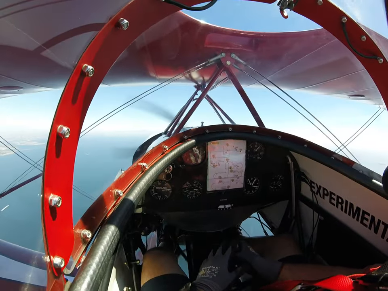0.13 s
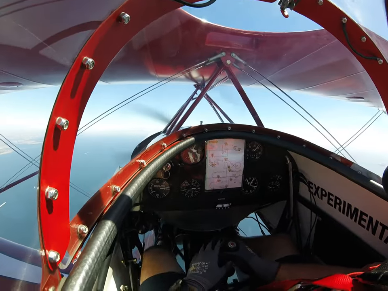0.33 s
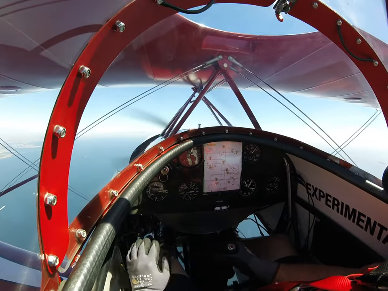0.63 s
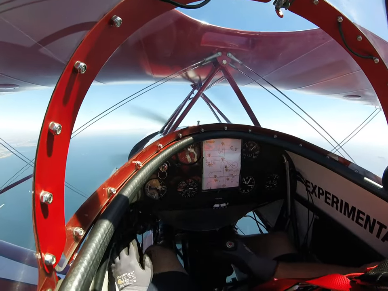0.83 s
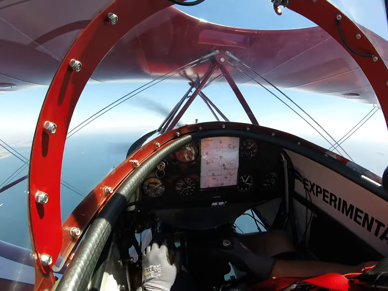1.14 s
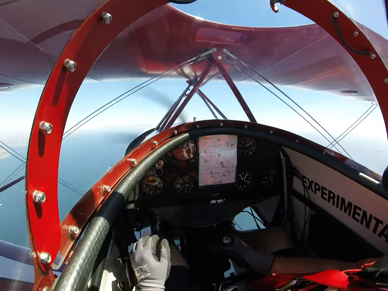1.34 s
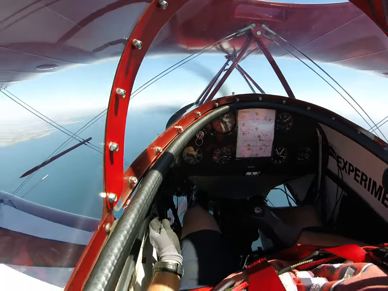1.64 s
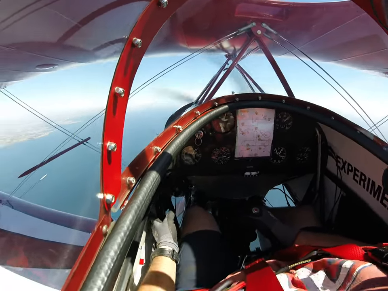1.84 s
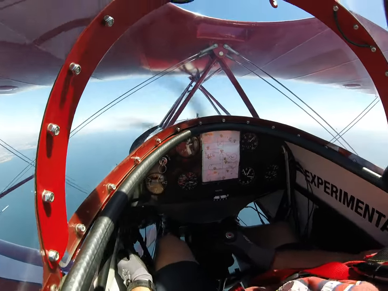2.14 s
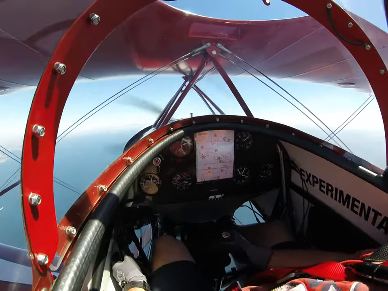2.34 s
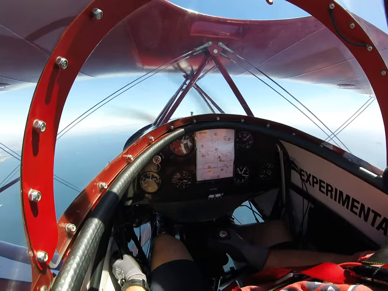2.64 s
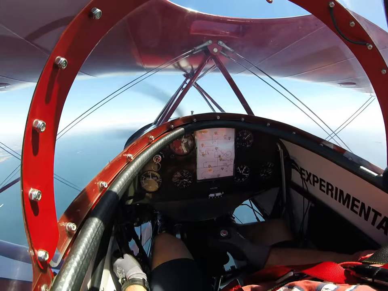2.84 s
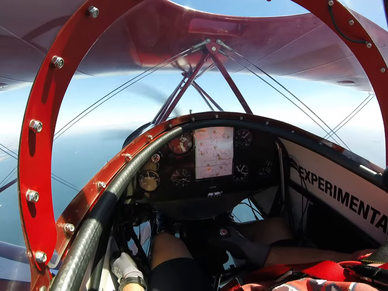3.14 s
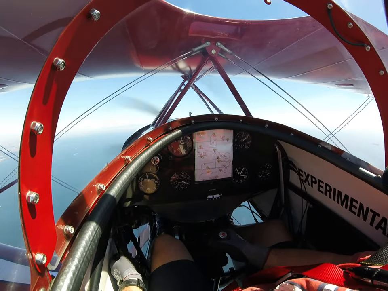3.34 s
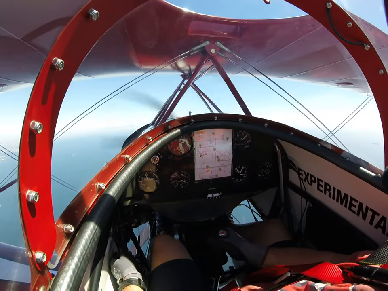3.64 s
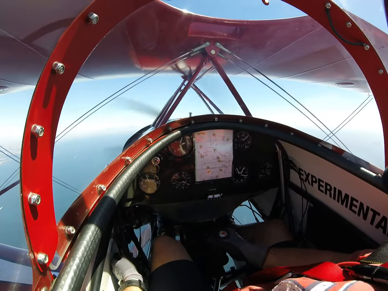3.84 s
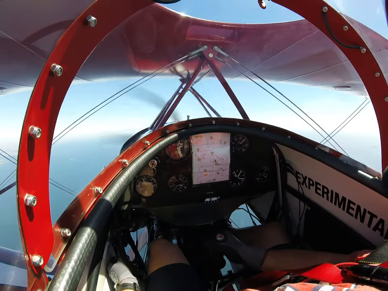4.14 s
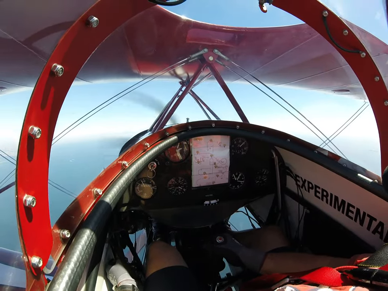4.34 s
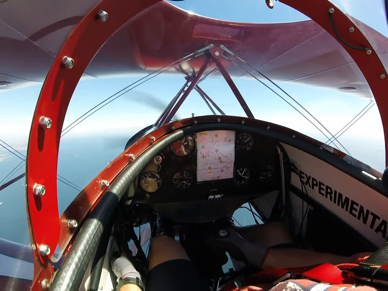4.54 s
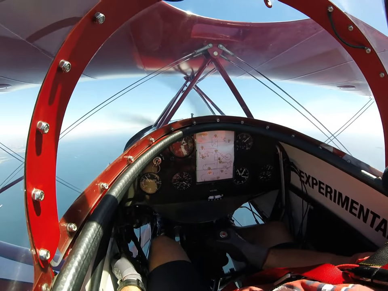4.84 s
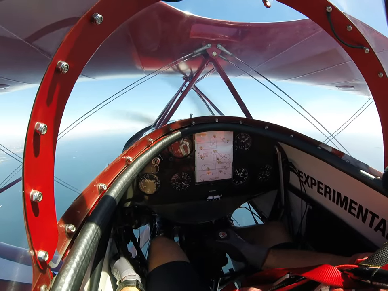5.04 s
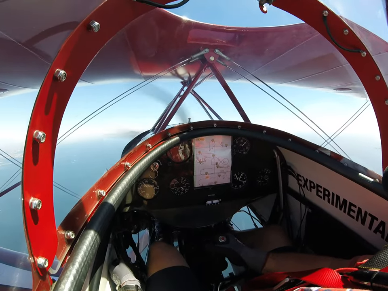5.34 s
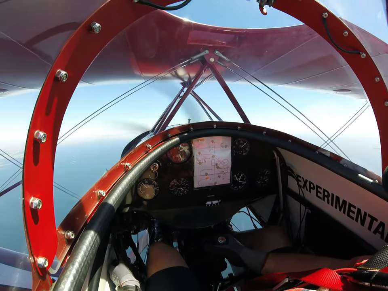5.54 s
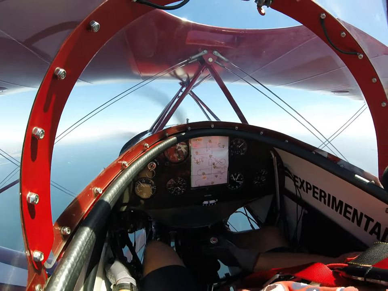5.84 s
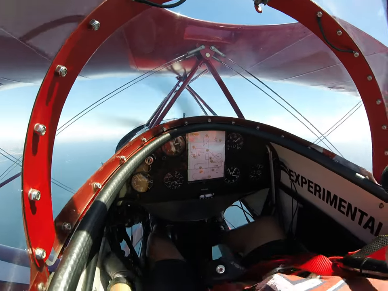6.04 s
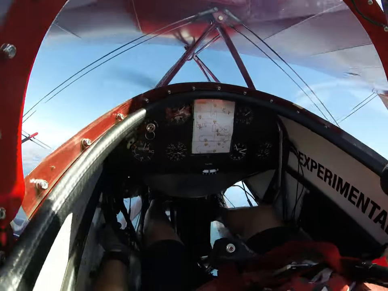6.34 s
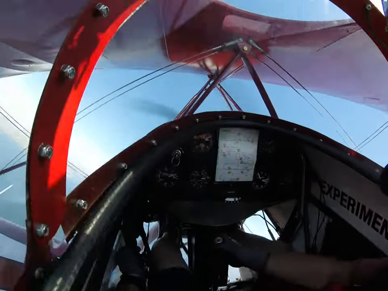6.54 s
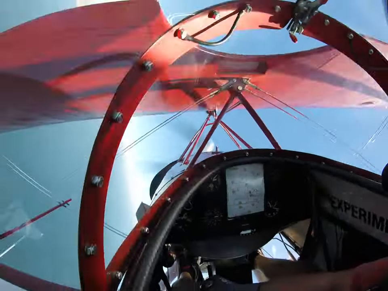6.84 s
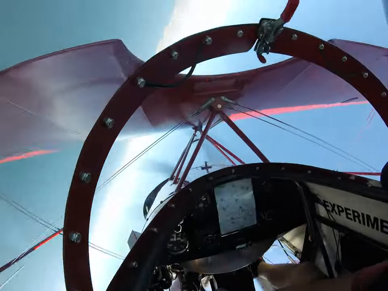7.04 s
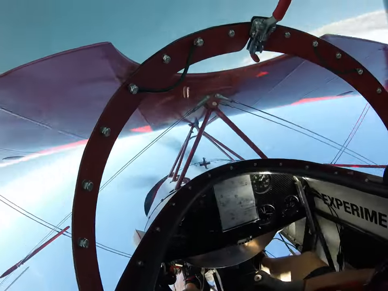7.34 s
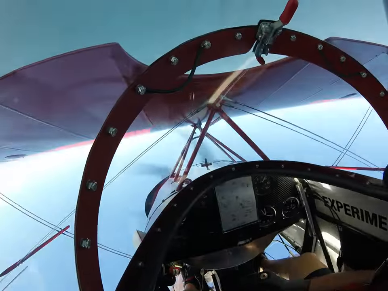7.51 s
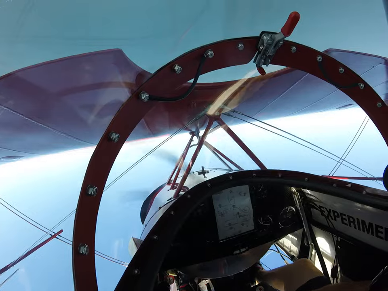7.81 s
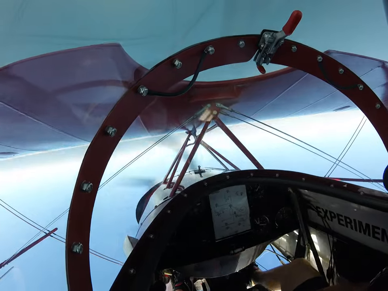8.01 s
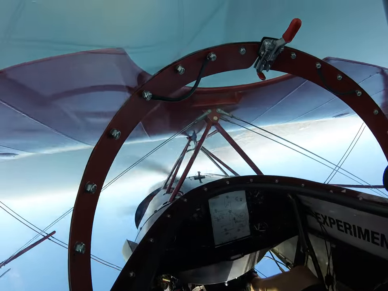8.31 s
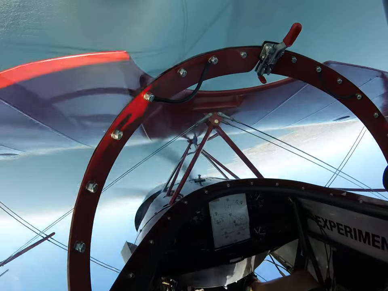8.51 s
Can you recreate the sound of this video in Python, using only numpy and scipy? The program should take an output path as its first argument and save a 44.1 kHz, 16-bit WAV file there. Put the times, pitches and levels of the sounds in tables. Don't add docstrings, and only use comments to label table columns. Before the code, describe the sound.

From the start, a loud piston engine and propeller drone fills a small aircraft cockpit: a low, rough hum around 80 Hz with a stronger buzzing exhaust note around 120 Hz and uneven growl between. Broad wind roar, airy hiss and ringing panels surround it. Over 0 to 6 seconds the pitch creeps up by about a semitone and the wind strengthens slightly; tiny ticks occur near 0.1, 2.1 and 5.3. At about 6.1 there is a tap and tick, then from 6.3 the pitch sags while deep, lumpy buffeting shakes the airframe. Rapid dull fabric slaps cluster from 6.6 to 6.85. Around 7 the cockpit suddenly calms, quieter and leaner, with pitch partly recovering. Until 8.67 the drone stays nearly steady and gradually regains level. The close onboard microphone sounds mono, slightly saturated, with patchy fine treble and no extreme highs.

```python
import sys
import numpy as np
from scipy import signal
from scipy.fft import rfft, irfft, next_fast_len
from scipy.io import wavfile
from scipy.ndimage import uniform_filter1d

SR = 44100
rng = np.random.default_rng(int(sys.argv[2]) if len(sys.argv) > 2 else 0)


def transcribe(signal):
    frames = np.atleast_2d(signal).T
    limited = np.clip(frames, -1, 1)
    pcm = np.round(limited * 32767).astype(np.int16)
    wavfile.write(sys.argv[1], SR, pcm)


def attenuation_scalar(level_db):
    decades = np.asarray(level_db, float) / 20
    return 10 ** decades


N = 382347

# t/s, blade rate f/Hz
SHAFT_SPEED = [(0, 79.46), (0.6, 79.76), (1, 80.28), (3, 81.95), (4, 82.7), (5.5, 83.8), (5.9, 83.9),
               (6.15, 84.2), (6.3, 83.94), (6.4, 83.02), (6.7, 80.32), (6.8, 79.78), (7, 80.62),
               (7.25, 81.3), (7.8, 80.94), (8.1, 80.82), (8.48, 81.14), (8.67, 81.14)]
# multiple of the four-stroke cycle, level/dB, lag/rad
UNEVEN_CYLINDERS = [(2, -25, 0.3), (3, -17, 1.95), (5, -12, 1.17), (7, -12, 0.33), (9, -5.5, 0.2),
                    (10, -22, 0.61), (11, -18, 0.56), (13, -28, 0.76), (14, -25.5, 0.7), (18, -25, 0.56),
                    (36, -30.5, 0.89)]
# f/Hz, level/dB
HISS_SPECTRUM = [(500, -17), (850, 0), (1150, -2.5), (1900, -1.5), (2600, -5.5), (3700, -7), (4050, -6.5),
                 (4400, -13), (5300, -15), (6100, -12), (6900, -16.5), (7600, -31), (9000, -41)]
# f/Hz, level/dB
SHEEN_SPECTRUM = [(6500, -19), (7500, 1), (9000, -3.5), (11200, -9.5), (11700, -15), (12900, -23.5),
                  (13200, -47)]
# f/Hz, level/dB
ROAR_SPECTRUM = [(30, -16), (60, 2.5), (110, 8), (170, 2.5), (210, -1), (280, -5), (400, -0.5), (520, -4),
                 (700, -11), (1000, -23), (1500, -18)]
PANEL_HZ = [310, 397, 440, 545, 600, 690, 735, 850, 995, 1345]
# width/Hz, level/dB re roar
PANEL_RESPONSE = [(30.2, -15.5), (26.8, -7), (30, -22), (23, -20), (20.2, -12), (24.6, -16.5), (30.4, -25),
                  (44.5, -18), (54, -20.5), (60, -24)]
# f/Hz, width/Hz, level/dB re slipstream
MICROPHONE_PORT = (6460, 100, -19)
# t/s, peak level/dB
FABRIC_SLAPS = [
    (6.111, -26),
    (6.399, -29),
    (6.638, -19),
    (6.68, -19),
    (6.724, -21),
    (6.761, -16),
    (6.814, -17),
    (6.849, -27),
]
# t/s, peak level/dB
HOUSING_TICKS = [
    (0.0867, -44),
    (2.0976, -38),
    (5.3274, -40),
    (6.1629, -37),
]
# f/Hz, level/dB re mean there
TREBLE_THRESHOLD = [(6000, -20), (7000, -12), (8300, -4), (9600, -2), (11000, -1), (12500, 3)]

# start t/s, attack/s, hold/s, release/s
STALL = (6.32, .11, 0.45, 0.18)
SHAKE = (6.42, 0.13, 0.3, 0.14)
DUCK = (6.88, 0.22, .1, 1.22)
LULL = (6.89, .09, .2, .14)
SAG = (6.95, .35, .5, .45)
INVERTED = (7.5, .3, 2, 1)

# cruise level/dB rms, slope/(dB per Hz of blade rate), stall/dB, duck/dB, flutter/dB
HISS_LAW = (-33, 0.78, 0, -4.5, 0.28)
SHEEN_LAW = (-21.5, -.1, -3, 0.5, 0.2)
ROAR_LAW = (-27.5, 0.63, -0.5, -2.5, 0.4)
BUFFET_LAW = (-35.5, .5, 1, -4, 3)
FIRING_LAW = (-22, 1.9, 7.5, 0.5, 1.5)
TWICE_FIRING_LAW = (-30, 0.3, -11, -5.5, 1.23)
FOUR_FIRING_LAW = (-32.5, 1.3, -10, 0.5, 1.4)
UNEVEN_LAW = (-20, -0.02, -6.5, -3.5, .5)
BLADE_LAW = (-17.5, 0.43, -6, -6.5, 0.5)
SECOND_BLADE_LAW = (-20, -0.84, -5.5, -4.5, .5)

# blade rate f/Hz, width/Hz, level/dB
PIPE_PEAK = (80.88, .28, 5.1)
PIPE_NOTCH = (82.8, 0.46, -16)

CRUISE_HZ = 81.5
FLUTTER_HZ = 4.9
DETUNE_HZ, DETUNE_DB_PER_HZ = 82.23, -5
FIRING_LAG_PER_HZ, SAG_LAG, INVERTED_LAG = 0.58, -0.8, -0.6
SAG_DB, LULL_DB, SHAKE_DB, SHAKE_ROAR_DB = -6.5, -4, 9.5, 4
INVERTED_DB, INVERTED_BLADE_DB = 3, -1.8
LOW_UNEVEN_DB_PER_HZ = 1
FIFTH_DB_PER_HZ = -6
START_RAD = -0.26


def rms_one(x):
    return x / np.sqrt(np.mean(x ** 2) + 1e-20)


def in_time(rows):
    s, *columns = np.transpose(rows)
    return [np.interp(np.arange(N) / SR, s, column) for column in columns]


def at_hz(points, hz):
    point_hz, db = np.array(points).T
    return np.interp(np.log(hz), np.log(point_hz), db)


def phase(start_s, attack_s, hold_s, release_s):
    corners_s = start_s + np.cumsum([0, attack_s, hold_s, release_s])
    return np.interp(np.arange(N) / SR, corners_s, [0, 1, 1, 0])


def drift(rate):
    r = np.exp(-80 * np.pi * rate / SR)
    noise = rng.standard_normal(N // 40 + 2002)
    slow = signal.lfilter([1], [1, -2 * r, r * r], noise)[2000:]
    return np.interp(np.arange(N) / 40, np.arange(len(slow)), rms_one(slow))


def level(law, blade_hz):
    cruise_db, per_hz_db, stall_db, duck_db, flutter_db = law
    steady_db = cruise_db + per_hz_db * (blade_hz - CRUISE_HZ)
    roll_db = stall_db * phase(*STALL) + duck_db * phase(*DUCK)
    return steady_db + roll_db + flutter_db * drift(FLUTTER_HZ)


def tuning(blade_hz, centre_hz, width, db):
    return db * np.exp(-((blade_hz - centre_hz) / width) ** 2)


def resonate(x, hz, width):
    r = np.exp(-np.pi * width / SR)
    zeros = np.array([1, 0, -1]) * (1 - r * r) / 2
    return signal.lfilter(zeros, [1, -2 * r * np.cos(2 * np.pi * hz / SR), r * r], x)


def shaped(x, spectrum):
    size = next_fast_len(N)
    hz = np.maximum(np.arange(size // 2 + 1) * SR / size, 1)
    inside = (hz > spectrum[0][0]) * (hz < spectrum[-1][0])
    gain = attenuation_scalar(at_hz(spectrum, hz)) * inside
    return rms_one(irfft(rfft(x, size) * gain, size)[:N])


def coloured(spectrum, gust_db, patchy_db):
    rest = shaped(rng.standard_normal(N), spectrum)
    out, gust = 0, drift(16)
    lowest_hz, highest_hz = spectrum[0][0], spectrum[-1][0]
    for edge_hz in lowest_hz * 2. ** np.arange(1, np.log2(highest_hz / lowest_hz)):
        below = signal.sosfilt(signal.butter(1, edge_hz, fs=SR, output="sos"), rest)
        rest = rest - below
        out = out + below * attenuation_scalar(patchy_db * drift(10))
    out = out + rest * attenuation_scalar(patchy_db * drift(14))
    return rms_one(out * attenuation_scalar(gust_db * gust))


def slipstream(cycle, hiss_db, sheen_db):
    throb_db = 0.7 * np.cos(4 * cycle + 1.1) + 0.47 * np.cos(cycle + 0.22)
    port_hz, width, port_db = MICROPHONE_PORT
    port = attenuation_scalar(port_db) * rms_one(resonate(rng.standard_normal(N), port_hz, width))
    sheen = attenuation_scalar(sheen_db + 1.85) * coloured(SHEEN_SPECTRUM, gust_db=0.45, patchy_db=-0.2)
    hiss = coloured(HISS_SPECTRUM, gust_db=0.5, patchy_db=-0.05)
    return attenuation_scalar(hiss_db + throb_db) * (hiss + port + sheen)


def cockpit(cycle, roar_db):
    turn = np.floor((cycle - 0.9) / (2 * np.pi))
    edge = np.diff(turn, prepend=turn[0]) * attenuation_scalar(0.37 * drift(11))
    edge = rms_one(edge - edge.mean())
    air = attenuation_scalar(-6) * rng.standard_normal(N)
    panels = 0
    for k, (hz, (width, db)) in enumerate(zip(PANEL_HZ, PANEL_RESPONSE)):
        path = round(rng.uniform(0, 0.02) * SR)
        drive = np.roll(edge, path) + air
        ringing = resonate(resonate(drive, hz, width), hz, 3 * width)
        panels = panels + (-1) ** k * attenuation_scalar(db) * rms_one(ringing)
    roar = attenuation_scalar(3.0) * coloured(ROAR_SPECTRUM, gust_db=0.16, patchy_db=0.2)
    return attenuation_scalar(roar_db) * (roar + panels)


def buffet(level_db):
    band = signal.butter(3, [28, 52], "band", fs=SR, output="sos")
    low = signal.sosfilt(band, rng.standard_normal(N))
    return attenuation_scalar(level_db + 0.76 * drift(8)) * rms_one(low)


def bursts(events, low_hz, high_hz, rise_s, fall_s, trim_db):
    since, envelope = np.arange(SR // 10) / SR, np.zeros(N)
    puff = (1 - np.exp(-since / rise_s)) * np.exp(-since / fall_s)
    for s, db in events:
        envelope[round(s * SR):][:len(since)] += attenuation_scalar(db + trim_db) * puff
    band = signal.butter(2, [low_hz, high_hz], "band", fs=SR, output="sos")
    return envelope * rms_one(signal.sosfilt(band, rng.standard_normal(N)))


def housing_ticks():
    return bursts(HOUSING_TICKS, low_hz=7500, high_hz=12500, rise_s=0.0003, fall_s=0.0012, trim_db=-2)


def fabric_slaps():
    return bursts(FABRIC_SLAPS, low_hz=250, high_hz=1800, rise_s=0.0032, fall_s=0.0057, trim_db=-2.5)


def tone(cycle, order, level_db, lag=0, flutter_db=0.26, wobble=0.072):
    envelope = np.sqrt(2) * attenuation_scalar(level_db + flutter_db * drift(6.6))
    return envelope * np.cos(order * cycle - lag + wobble * drift(3.2))


def exhaust(cycle, blade_hz):
    over = np.maximum(blade_hz - CRUISE_HZ, 0)
    sag, inverted = phase(*SAG), phase(*INVERTED)
    firing_db = level(FIRING_LAW, CRUISE_HZ + over) + SAG_DB * sag
    uneven_db = level(UNEVEN_LAW, blade_hz)
    pipe_db = tuning(blade_hz, *PIPE_PEAK) + tuning(blade_hz, *PIPE_NOTCH)
    twice_db = level(TWICE_FIRING_LAW, blade_hz) + pipe_db
    detune_db = DETUNE_DB_PER_HZ * np.maximum(blade_hz - DETUNE_HZ, 0)
    four_db = level(FOUR_FIRING_LAW, blade_hz) + detune_db + 2 * LULL_DB * phase(*LULL)
    firing_lag = 0.03 + FIRING_LAG_PER_HZ * over + SAG_LAG * sag + INVERTED_LAG * inverted
    fifth_db = four_db - 9.5 + FIFTH_DB_PER_HZ * over

    out = tone(cycle, order=6, level_db=firing_db + 0.5, lag=firing_lag, flutter_db=0.5)
    out += tone(cycle, order=12, level_db=twice_db - 3.0 + INVERTED_DB * inverted, lag=2.25, wobble=0.29)
    out += tone(cycle, order=24, level_db=four_db - 3.5, lag=0.26, flutter_db=0.5, wobble=0.18)
    out += tone(cycle, order=30, level_db=fifth_db, lag=0.52, flutter_db=0.5, wobble=0.27)
    out += tone(cycle, order=36, level_db=twice_db - 18, lag=0.71, flutter_db=0.5, wobble=0.3)
    for order, db, lag in UNEVEN_CYLINDERS:
        swell_db = (order < 7.5) * LOW_UNEVEN_DB_PER_HZ * over
        out += tone(cycle, round(order), uneven_db + db + swell_db, lag, flutter_db=0.0, wobble=0.11)
    return out


def propeller(cycle, first_db, second_db):
    first = tone(cycle, order=4, level_db=first_db - 0.04)
    second = tone(cycle, order=8, level_db=second_db + 0.53, lag=0.23)
    return -first - second


def scene():
    blade_hz, = in_time(SHAFT_SPEED)
    cycle = 2 * np.pi * np.cumsum(blade_hz / 4) / SR + START_RAD
    roar_db = level(ROAR_LAW, blade_hz) + LULL_DB * phase(*LULL) + SHAKE_ROAR_DB * phase(*SHAKE)
    air = slipstream(cycle, level(HISS_LAW, blade_hz), level(SHEEN_LAW, blade_hz))
    air = air + cockpit(cycle, roar_db)
    air = air + buffet(level(BUFFET_LAW, blade_hz) + SHAKE_DB * phase(*SHAKE))
    blade_db = level(BLADE_LAW, blade_hz) + INVERTED_BLADE_DB * phase(*INVERTED)
    engine = exhaust(cycle, blade_hz) + propeller(cycle, blade_db, level(SECOND_BLADE_LAW, blade_hz))
    return (air + housing_ticks() + fabric_slaps() + engine)[None]


def starved(x, spread_db):
    hz, _, bins = signal.stft(x, SR, nperseg=2048, noverlap=1536)
    frames = bins.shape[-1]
    tiles = rng.standard_normal((len(hz) // 7 + 1, frames // 6 + 1))
    tiles = np.repeat(np.repeat(tiles, 7, axis=0), 6, axis=1)[:len(hz), :frames]
    power = abs(bins) ** 2
    mean = np.sqrt(uniform_filter1d(power, size=120, axis=-1))
    local = np.sqrt(uniform_filter1d(power, size=4, axis=-1))
    threshold_db = at_hz(TREBLE_THRESHOLD, hz + 1)[:, None] + spread_db * tiles
    untouched = (hz < TREBLE_THRESHOLD[0][0])[:, None]
    keep = (local > mean * attenuation_scalar(threshold_db)) | untouched
    return signal.istft(bins * keep, SR, nperseg=2048, noverlap=1536)[1][:, :N]


def top_cut(x):
    return signal.sosfilt(signal.butter(12, 13370, fs=SR, output="sos"), x)


def record(dry):
    rounded = 0.86 * np.tanh(dry / 0.88)
    mix = starved(rounded - rounded.mean(), spread_db=6.0)
    return top_cut(mix)


dry = scene()
out = record(dry)
transcribe(out)
```